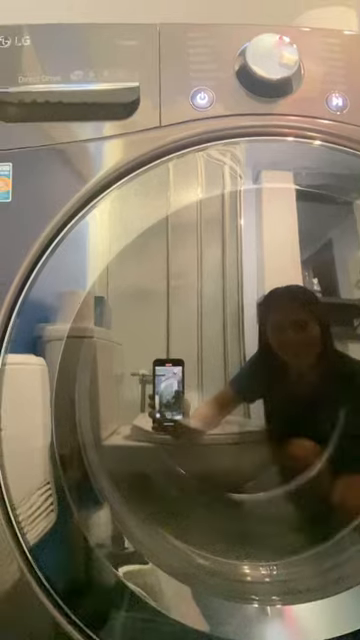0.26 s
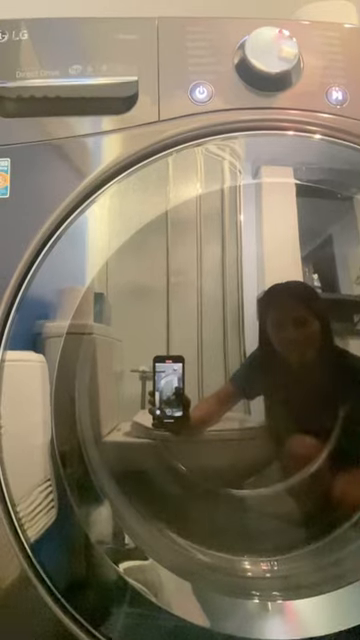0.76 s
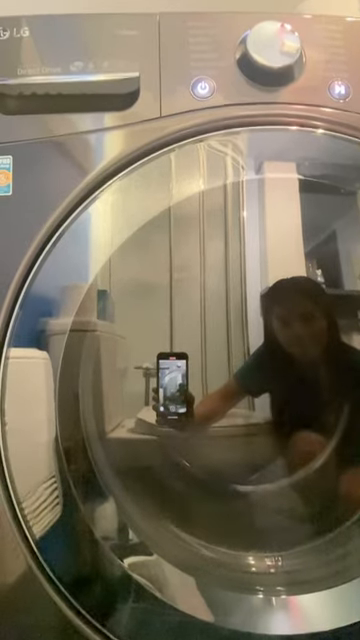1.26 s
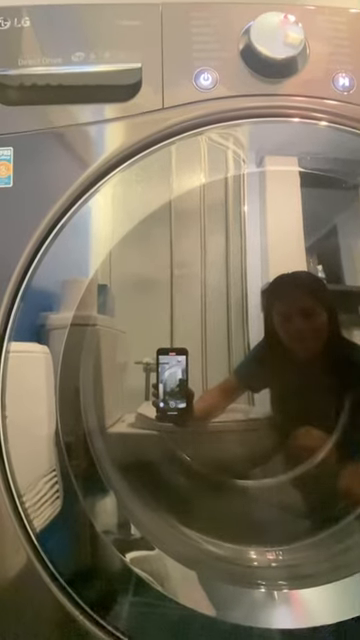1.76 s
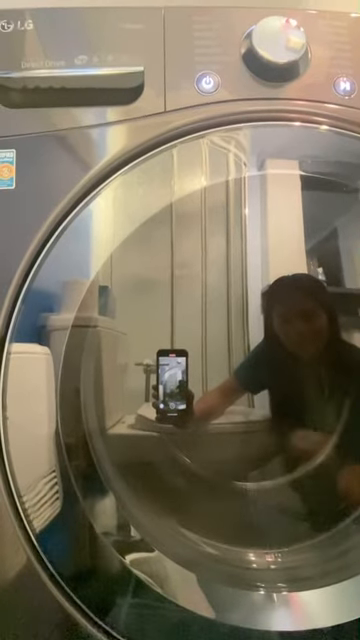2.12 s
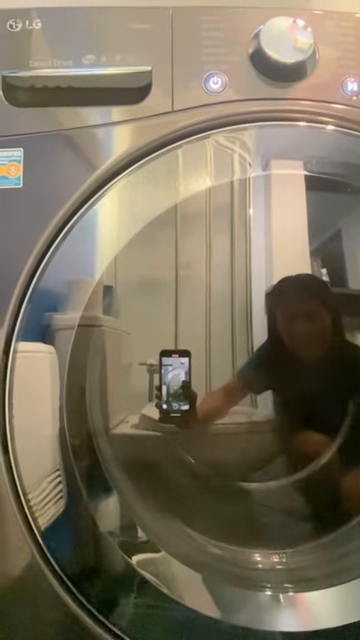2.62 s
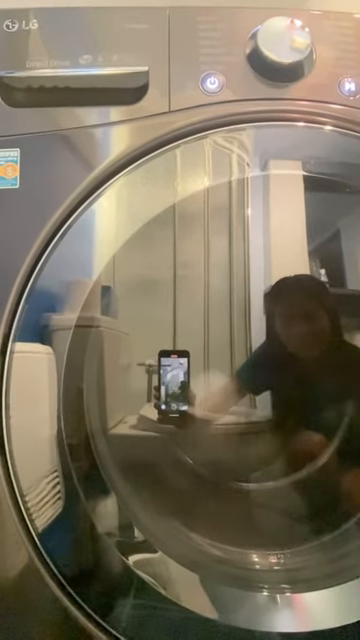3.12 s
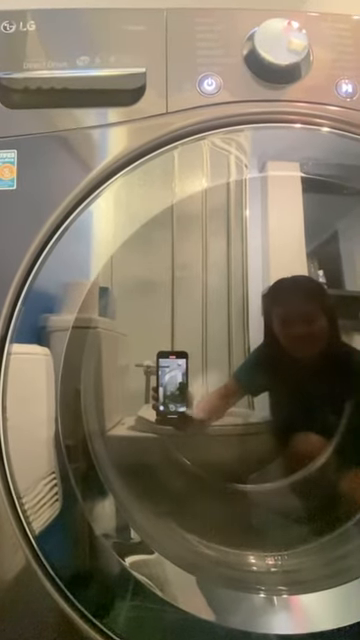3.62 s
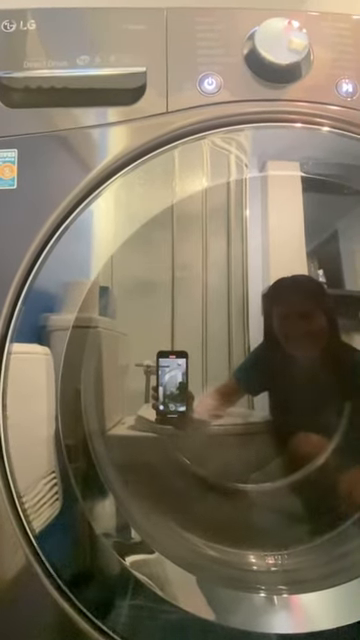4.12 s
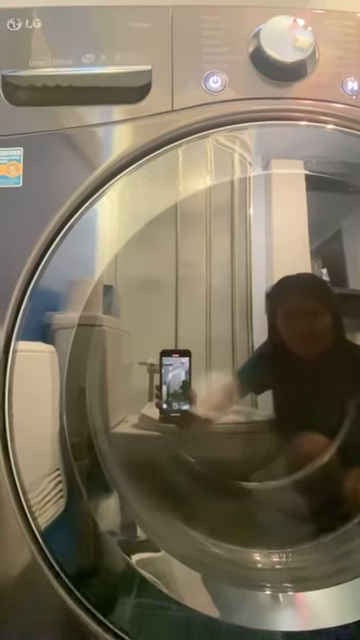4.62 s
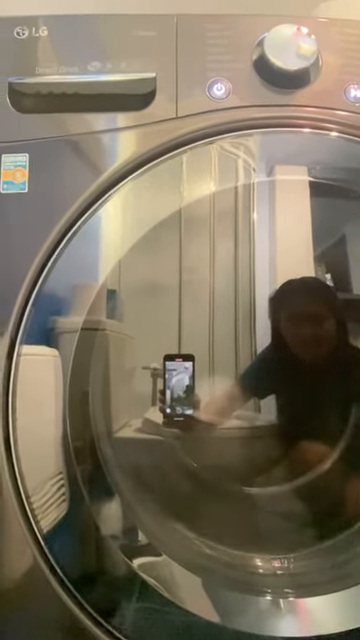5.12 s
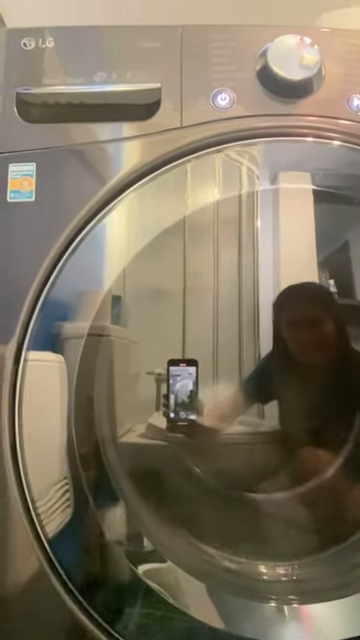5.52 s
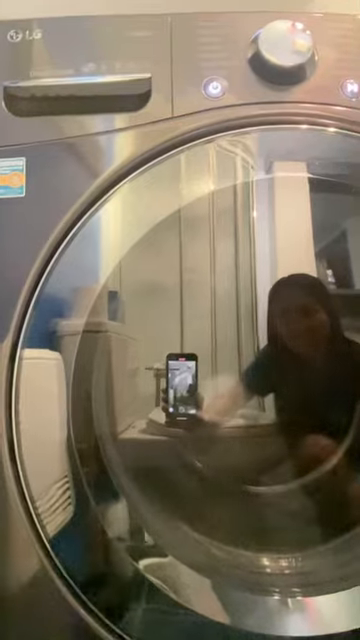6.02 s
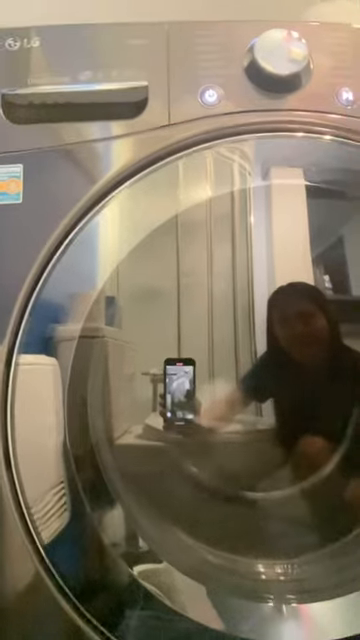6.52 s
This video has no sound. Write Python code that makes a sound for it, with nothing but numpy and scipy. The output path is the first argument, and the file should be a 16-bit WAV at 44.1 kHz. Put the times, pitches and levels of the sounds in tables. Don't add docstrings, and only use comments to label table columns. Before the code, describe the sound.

Phone held near a washing machine door, small hard room. Quiet fan hum and thin whine first, then a cluster of dull bumps as the inlet opens; pressurised water hisses unevenly and pours through the dispenser into the drum. It cuts out, leaving draining gulps, faint bumps and a quick loose plastic clatter. Around two seconds it thumps open again and keeps hissing, rushing and rumbling.

```python
import sys
import numpy as np
from scipy import signal
from scipy.fft import rfft, irfft, next_fast_len
from scipy.io import wavfile
from scipy.ndimage import uniform_filter1d, map_coordinates

SR = 44100
rng = np.random.default_rng(int(sys.argv[2]) if len(sys.argv) > 2 else 0)


def transcribe(signal):
    frames = np.atleast_2d(signal).T
    limited = np.clip(frames, -1, 1)
    pcm = np.round(limited * 32767).astype(np.int16)
    wavfile.write(sys.argv[1], SR, pcm)


def boost_factor(decibels):
    exponent = np.asarray(decibels, float) / 20
    return 10 ** exponent


N = 298557
CLOCK = np.arange(0, N + 64, 64) / SR

# (centre [Hz], width [Hz], lift [dB])
DRAWER = [(1176, 120, 5.5), (1973, 200, 5), (2596, 38, 8.5), (3010, 85, 4), (3730, 21, -1), (4080, 29, -1),
          (11200, 240, 1)]
# (opens [s], shuts [s], water reaches the drawer after [s], share of the overshoot [ratio],
# stands deep enough to sing after [s])
FILLS = [
    (0.384, 1.105, 0.0047, 1.12, 0.15),
    (1.982, 9, 0.076, .8, 0.071),
]
# (peak time [s], level [dB], length [s])
GURGLES = [
    (.04, -71, 0.05),
    (.3, -60.5, 0.033),
    (1.29, -65.5, 0.043),
    (1.44, -65, 0.018),
    (1.6, -63, 0.016),
    (1.69, -59.5, 0.029),
    (1.935, -70, 0.014),
    (2.0, -56, 0.018),
]
# (peak time [s], level [dB], rise [s], fall [s])
SHUDDERS = [
    (.515, -33, 0.036, 0.029),
    (1.0, -40.5, 0.078, 0.11),
    (1.25, -51, .08, .2),
    (2.2, -34.5, 0.053, 0.037),
    (2.33, -38.5, 0.057, 0.13),
]


def unit(x):
    return x / np.sqrt(np.mean(x ** 2) + 1e-20)


def along(points, hz):
    f, v = np.transpose(points)
    return np.interp(np.log(hz + 1), np.log(f + 1), v)


def wobble(rate):
    knots = rng.standard_normal(int(N * rate / SR) + 4)
    return map_coordinates(knots, [np.arange(N) * rate / SR])


def filtered(x, response):
    m = next_fast_len(N + SR // 2)
    return irfft(rfft(x, m) * response(np.fft.rfftfreq(m, 1 / SR)), m)[..., :N]


def ringing(modes, f):
    total = 0
    for k, (centre, width, db) in enumerate(modes):
        damping = 1j * f * width
        total = total + (-1) ** k * boost_factor(db) * damping / (centre * centre - f * f + damping)
    return total


def noise(gain, patchy_db):
    z = signal.stft(rng.standard_normal((2, N)), nperseg=512)[2]
    field = uniform_filter1d(rng.standard_normal(z.shape[1:]), size=8, axis=0)
    field = uniform_filter1d(field, size=12, axis=1)
    pair = signal.istft(z * boost_factor(patchy_db * unit(field)), nperseg=512)[1][:, :N]
    return unit(filtered(pair, gain))


def bubbles(per_s, centre_hz, cycles, spread_db):
    length = 700
    draw = rng.random((int(per_s * N / SR), 4))
    hz = centre_hz * np.exp(1.397 * (draw[:, 1:2] - .5))
    turns = hz * np.arange(length) / SR
    size = boost_factor(-spread_db * np.log(draw[:, 2:3] + 0.00064))
    chirp = np.sin(2 * np.pi * turns * (1 + 0.12 * turns / cycles))
    wave = size * chirp * np.exp(-3 * turns / cycles) * (1 - np.exp(-turns))
    channel = draw[:, 3:] < .5
    at = (draw[:, :1] * N).astype(int) + np.arange(length) + (N + length) * channel
    pops = np.bincount(at.ravel(), wave.ravel(), 2 * (N + length)).reshape(2, -1)[:, :N]
    return unit(signal.lfilter(*signal.butter(4, min(6 * centre_hz / SR, .9)), pops))


def smooth(power):
    return np.interp(np.arange(N) / SR, CLOCK, np.sqrt(power))


def swells(rows):
    power = 0
    for s, db, *times in rows:
        u = CLOCK - s
        power = power + boost_factor(2 * db) * np.exp(-np.where(u < 0, (u / times[0]) ** 2, u / times[-1]))
    return power


def walls(x, wet_db):
    # (frequency [Hz], t60 [s])
    decay = [(300, 0.086), (3000, 0.12), (12000, 0.08)]
    hz, t, z = signal.stft(rng.standard_normal(SR // 3), SR, nperseg=256)
    tail = signal.istft(z * boost_factor(-60 * t / along(decay, hz)[:, None]), SR, nperseg=256)[1]
    tail = np.pad(tail, (150, 0))[None] / np.linalg.norm(tail)
    wet = signal.fftconvolve(x, tail, axes=1)[:, :N]
    return (x + boost_factor(wet_db) * wet) / np.sqrt(1 + boost_factor(2 * wet_db))


def room():
    # (frequency [Hz], density [dB per Hz])
    floor = [(100, -1), (300, -9), (1000, -16.5), (3300, -35), (8000, -39.5), (11000, -42.5), (12800, -46),
             (13500, -60), (14200, -90)]
    t = np.arange(N) / SR
    air = boost_factor(-48.5) * noise(lambda f: boost_factor(along(floor, f)), patchy_db=1.95)
    hum = boost_factor(-49 + 1.2 * wobble(11)) * np.sin(2 * np.pi * 214 * t + .6 * wobble(14))
    whine = boost_factor(-67 + .8 * wobble(6)) * np.sin(2 * np.pi * 15040 * t + 1.2 * wobble(60))
    return air + hum * [[1], [0]] + whine * [[1], [3.5]]


def jolts():
    # (time [s], boom [dB], rap [dB])
    hose_jolts = [(0.279, -54, -29), (0.387, -46, -22), (0.42, -38, -22), (0.452, -28, -25),
                  (0.469, -33, -30), (0.489, -32, -34), (0.518, -35, -37), (0.544, -32, -25),
                  (1.3, -51, -42), (1.394, -40, -29), (2.06, -37, -32), (2.099, -32, -24),
                  (2.163, -32, -39), (2.21, -36, -25)]
    # (centre [Hz], width [Hz], level [dB])
    cabinet = [(72, 8.2, 11), (231, 56, 0), (332, 390, -12.5)]
    # (centre [Hz], width [Hz], level [dB])
    panel = [(264, 27, 9.5), (416, 42, 7.5), (545, 67, 11.5), (930, 80, -9), (1330, 140, 4),
             (2200, 420, -24)]
    push, rap = np.zeros((2, N)), np.zeros((2, N))
    t = np.arange(SR // 20) / SR
    for s, boom_db, rap_db in hose_jolts:
        at = round(s * SR)
        push[:, at] = boost_factor(boom_db + 42.5)
        envelope = boost_factor(rap_db + 12.5 - 60 * t / 0.016) * np.minimum(t / 0.0025, 1)
        rap[:, at:at + len(t)] += envelope * rng.standard_normal((2, len(t)))
    boom = filtered(push, lambda f: ringing(cabinet, f))
    return boom + filtered(rap, lambda f: ringing(panel, f))


def pressure(starved_db):
    # (time [s], jet level [dB])
    line = [
        [(.384, -48), (.44, -50), (.49, -49), (.63, -40), (.71, -44.5), (.78, -50.5), (.9, -44), (1.0, -53.5),
         (1.1, -51)],
        [(1.982, -60.5), (2.05, -53.5), (2.13, -49.5), (2.23, -42.5), (2.3, -42), (2.37, -50), (2.5, -42.5),
         (2.65, -46), (2.75, -43)],
    ]
    leak_db, dying_db_per_s = -80, 260
    starved_at_s, starved_s = 0.7, 0.39
    starved_grows = 0.21
    power = boost_factor(2 * leak_db) + boost_factor(2 * -28) * swells(GURGLES)
    for (opens, shuts, *_), curve in zip(FILLS, line):
        u = np.maximum(CLOCK - opens, 0)
        line_db = np.interp(CLOCK, *np.transpose(curve))
        dip = 1 + starved_grows * (line_db.max() - line_db)
        loss = starved_db * dip * np.exp(-((u - starved_at_s) / starved_s) ** 2)
        loss = loss + dying_db_per_s * np.maximum(CLOCK - shuts, 0)
        power = power + boost_factor(2 * (line_db - loss)) * np.minimum(u / 0.0086, 1) ** 2
    return smooth(power)


def flow(extra, steady_db, shut_db, over_db, fade_s, drain_db_per_s, deep=False):
    dry_s, dry_db_per_s = 0.46, 70
    power = boost_factor(2 * shut_db) + extra
    for opens, shuts, wet_s, share, deep_s in FILLS:
        u, after = np.maximum(CLOCK - opens, 0), np.maximum(CLOCK - shuts, 0)
        drained_db = drain_db_per_s * after + dry_db_per_s * np.maximum(after - dry_s, 0)
        arrived = 1 - np.exp(-(u / (deep_s if deep else wet_s)) ** 5)
        over = share * over_db * np.exp(-(u / fade_s) ** 2)
        power = power + arrived ** 2 * boost_factor(2 * (steady_db + over - drained_db))
    return smooth(power)


def drawer_lift(f):
    return sum(db / (1 + (2 * (f - centre) / width) ** 2) for centre, width, db in DRAWER)


def valve_jet(surge):
    # (frequency [Hz], density [dB per Hz])
    spectrum = [(1500, -73), (2500, -0.5), (3800, 1.5), (5200, 1.5), (7000, -2.5), (8800, 1), (11200, 1.5),
                (12000, -3), (15600, -2.5)]
    hiss = pressure(starved_db=0)
    jet = noise(lambda f: boost_factor(along(spectrum, f) + drawer_lift(f)), patchy_db=0.97)
    jet = boost_factor(5.5 + 0.097 * surge + 0.26 * wobble(24)) * jet
    spray = filtered(jet, lambda f: np.clip((6000 - f) / 800, 0, 1))
    jet = hiss * (jet - spray) + pressure(starved_db=2.5) * spray
    highest = filtered(jet, lambda f: np.clip(f / 800 - 16, 0, 1))
    return jet - (1 - np.clip(hiss * boost_factor(58), .03, 1)) * highest


def drawer_rush(surge):
    # (frequency [Hz], density [dB per Hz])
    spectrum = [(300, -14.5), (600, -7), (1000, -10.5), (1500, -12.5), (2000, -9.5), (2700, -7.5),
                (3500, -17.5), (6000, -26), (12000, -63), (13000, -120)]
    rush = noise(lambda f: boost_factor(along(spectrum, f) + drawer_lift(f)), patchy_db=2.0)
    rush += boost_factor(-18.5) * bubbles(250, centre_hz=1755, cycles=16.3, spread_db=5.5)
    gain = flow(swells(GURGLES), steady_db=-47.5, shut_db=-70.5, over_db=0.5, fade_s=0.23, drain_db_per_s=190)
    return boost_factor(3.0 + .5 * surge) * gain * rush


def drawer_cavity():
    # (centre [Hz], width [Hz], level [dB])
    modes = [(723, 66, 0.5), (826, 54, 0)]
    cavity = noise(lambda f: ringing(modes, f) / (1 + (f / 2000) ** 4), patchy_db=1.0)
    gain = flow(boost_factor(2 * -4) * swells(GURGLES), steady_db=-47, shut_db=-70, over_db=4, fade_s=.5,
                drain_db_per_s=260, deep=True)
    return boost_factor(.5 + .7 * wobble(5)) * gain * cavity


def drum_slosh():
    # (frequency [Hz], density [dB per Hz])
    spectrum = [(100, -1), (250, -.5), (360, -4), (700, -10), (1500, -18), (3000, -36), (6000, -28),
                (12000, -56), (13000, -120)]
    slosh = noise(lambda f: boost_factor(along(spectrum, f)), patchy_db=0.5)
    slosh += boost_factor(-17.5) * bubbles(60, centre_hz=595, cycles=5.8, spread_db=2.0)
    gain = flow(boost_factor(2 * 10.5) * swells(GURGLES), steady_db=-52, shut_db=-58.5, over_db=7, fade_s=0.65,
                drain_db_per_s=3)
    return boost_factor(5.0) * gain * slosh


def cabinet_rumble():
    # (frequency [Hz], density [dB per Hz])
    spectrum = [(30, -51), (45, -3), (55, 10.5), (66, -3), (77, 14.5), (90, -9), (120, 3.5), (165, -2),
                (250, -45), (1000, -44), (4000, -120)]
    rumble = noise(lambda f: boost_factor(along(spectrum, f)), patchy_db=2.0)
    mode = boost_factor(2 * wobble(9.8)) * np.sin(2 * np.pi * 77 * np.arange(N) / SR + 1.7 * wobble(8))
    rumble += boost_factor(-8.0) * mode
    shudder = swells(SHUDDERS)
    gain = flow(.5 * shudder, steady_db=-53, shut_db=-64, over_db=1.5, fade_s=-1.5, drain_db_per_s=8)
    shaken = boost_factor(-2) * smooth(shudder) * mode * [[1], [0]]
    return boost_factor(1.0) * gain * rumble + shaken


def water():
    surge = wobble(10)
    bright = valve_jet(surge) + drawer_rush(surge)
    return walls(bright, wet_db=-6) + drawer_cavity() + drum_slosh() + cabinet_rumble()


def knocks():
    # (time [s], peak [dB], ring [Hz], t60 [s])
    contacts = [
        (1.649, -33, 616, 0.027),
        (1.662, -31, 228, 0.043),
        (1.669, -26.5, 428, 0.027),
        (1.673, -28, 860, 0.036),
        (1.677, -32.5, 536, 0.064),
        (1.684, -33, 386, 0.057),
        (1.695, -38, 292, 0.063),
        (1.711, -36.5, 322, .1),
    ]
    out, t = np.zeros((2, N)), np.arange(SR // 6) / SR
    for s, db, hz, t60 in contacts:
        ring = boost_factor(-60 * t / t60) * np.sin(2 * np.pi * hz * t + [[0], [1.2]]) * (1 - np.exp(-t / 0.00024))
        tick = boost_factor(2.0 - 60 * t / 0.042) * rng.standard_normal((2, len(t)))
        out[:, round(s * SR):][:, :len(t)] += boost_factor(db) * (ring + tick)
    return out


def scene():
    soft_hz = 2300
    hits = filtered(jolts() + knocks(), lambda f: 1 / (1 + 1j * f / soft_hz) ** 4)
    return room() + walls(hits, wet_db=-1.5) + water()


def band_limit(x):
    return signal.sosfilt(signal.butter(12, 15750, fs=SR, output="sos"), x)


def record(dry):
    # (frequency [Hz], likeness [ratio])
    alike = [(100, .995), (400, .95), (800, .8), (1200, .45), (2500, .35), (4000, .45), (4800, .87),
             (6000, .95), (9000, .999), (12000, .999), (13500, .88), (15000, .98)]
    # (frequency [Hz], left over right [dB])
    shade = [(60, 0), (600, -3.5), (1200, 1.5), (2100, 4), (2500, 1), (5000, 0.5)]
    # (frequency [Hz], left leads by [rad])
    twist = [(200, -0.041), (1000, 1.2), (1700, 1.2), (2300, -0.7), (3000, -1.35), (3700, 1.56),
             (4800, 0.13), (8600, -0.068), (9300, -0.58), (11800, 0.29), (13500, 0.0058)]
    lag_s = 9.7e-5
    top_hz, low_hz = 15750, 47

    def split(f):
        turn = np.arccos(np.clip(along(alike, f), 0, 1)) / 2
        band = (f < top_hz) * f ** 6 / (f ** 6 + low_hz ** 6)
        return band * np.array([np.cos(turn), np.sin(turn)])

    def half(f):
        return boost_factor(along(shade, f) / 2) * np.exp(.5j * along(twist, f) - 1j * np.pi * f * lag_s)

    shared, diffuse = filtered(dry, split)
    ports = np.array([shared + diffuse, shared - diffuse])
    ports = filtered(ports, lambda f: np.array([half(f), 1 / half(f)]))
    return band_limit(ports)


dry = scene()
out = record(dry)
transcribe(out)
```